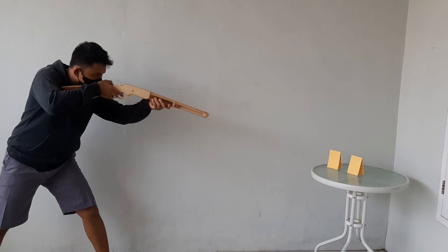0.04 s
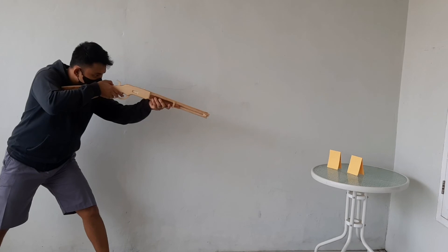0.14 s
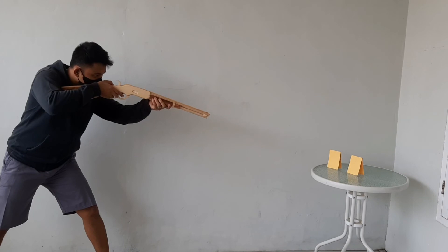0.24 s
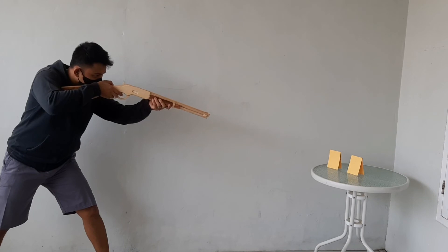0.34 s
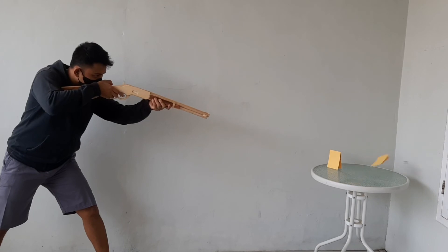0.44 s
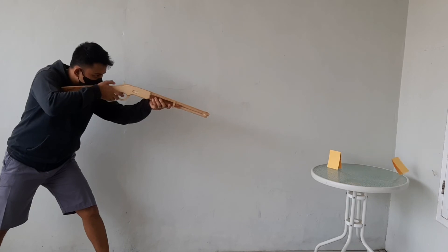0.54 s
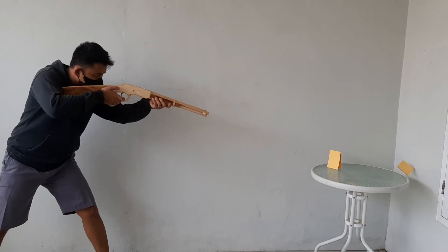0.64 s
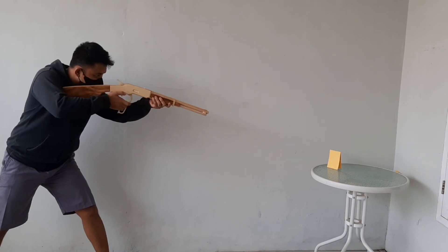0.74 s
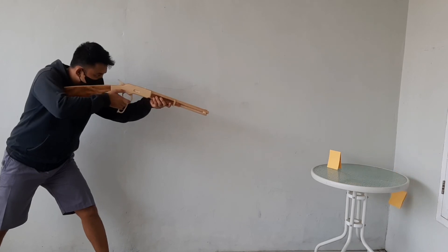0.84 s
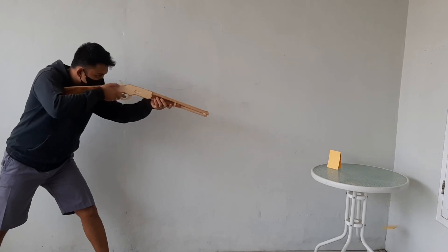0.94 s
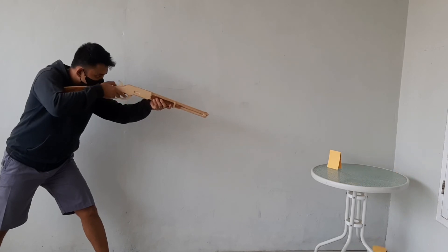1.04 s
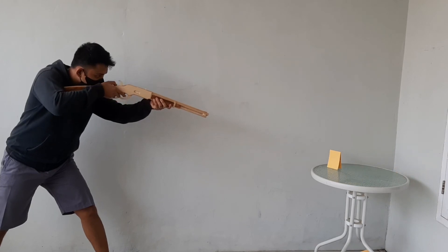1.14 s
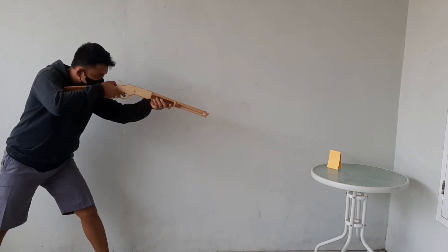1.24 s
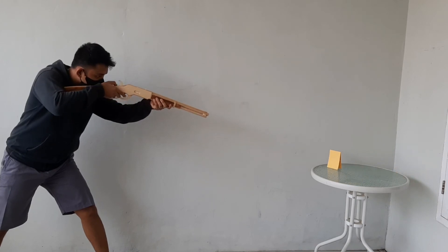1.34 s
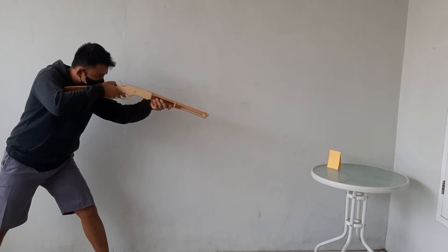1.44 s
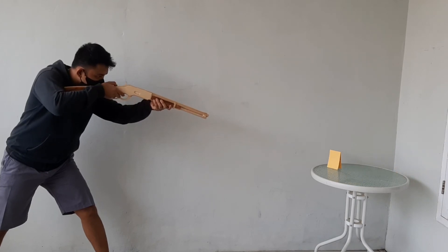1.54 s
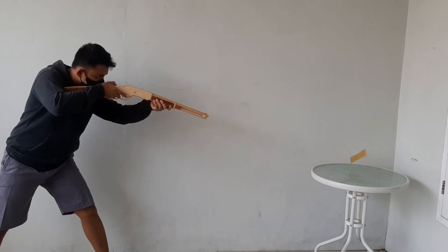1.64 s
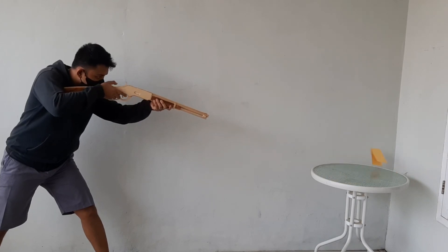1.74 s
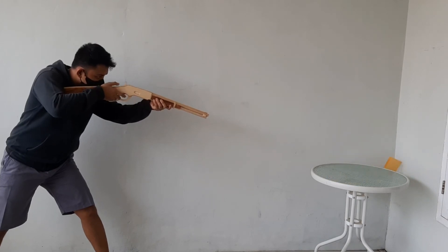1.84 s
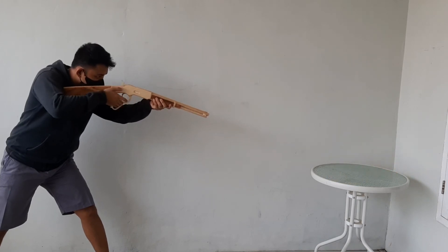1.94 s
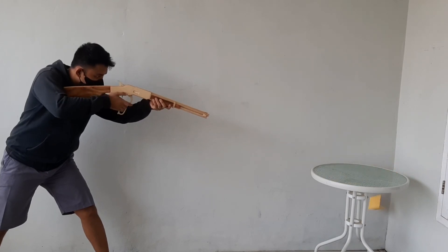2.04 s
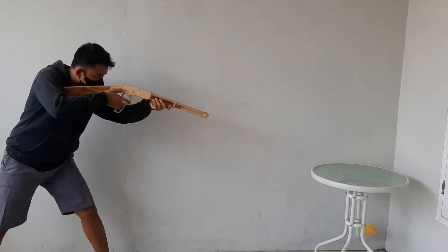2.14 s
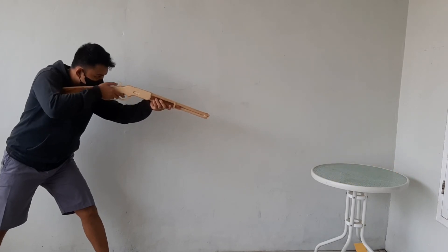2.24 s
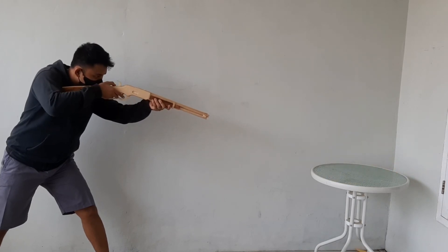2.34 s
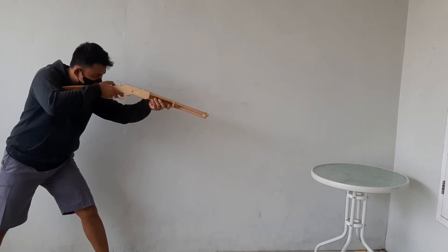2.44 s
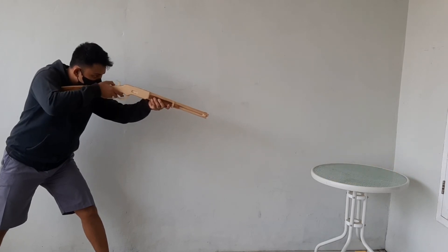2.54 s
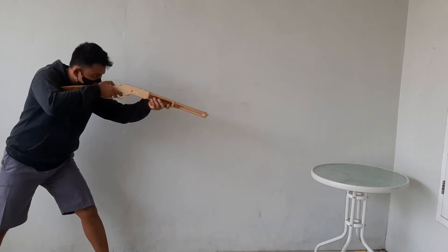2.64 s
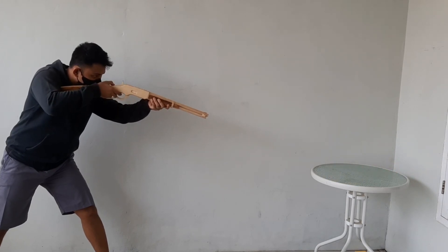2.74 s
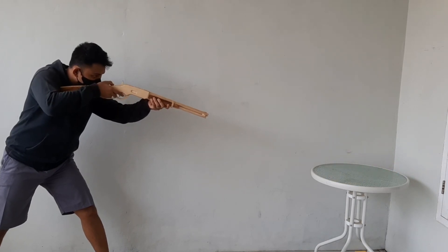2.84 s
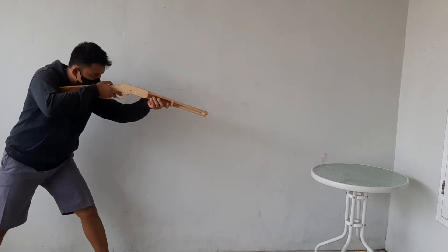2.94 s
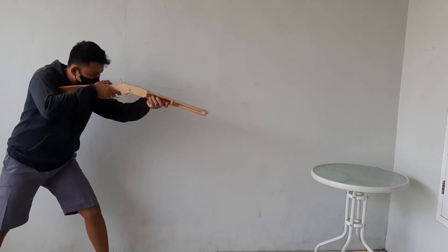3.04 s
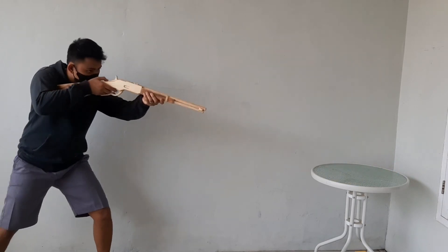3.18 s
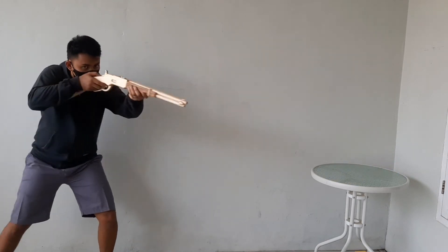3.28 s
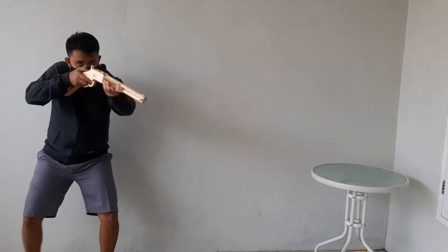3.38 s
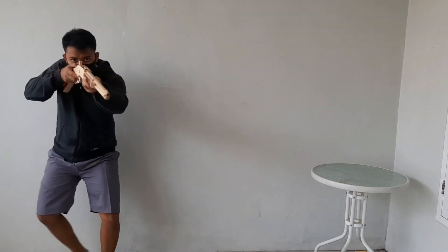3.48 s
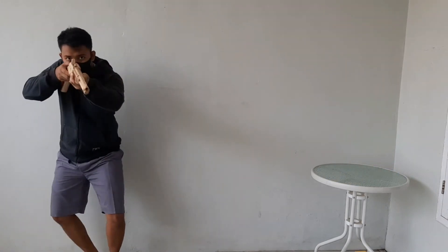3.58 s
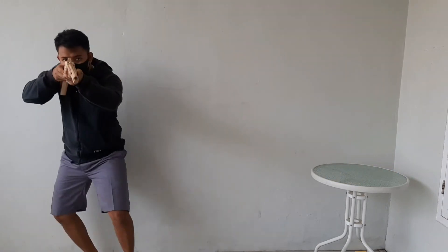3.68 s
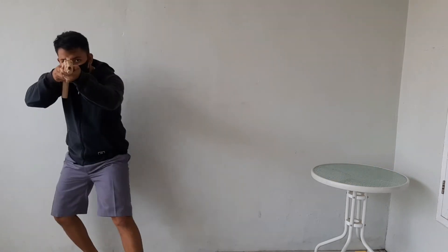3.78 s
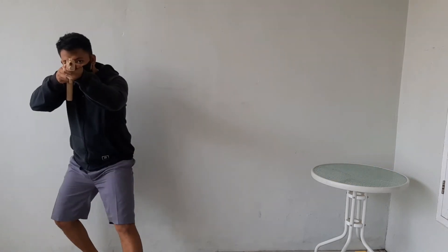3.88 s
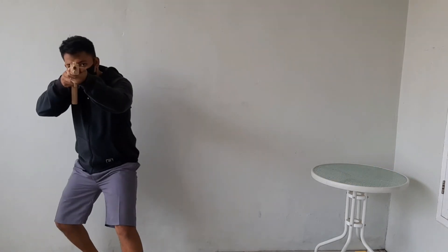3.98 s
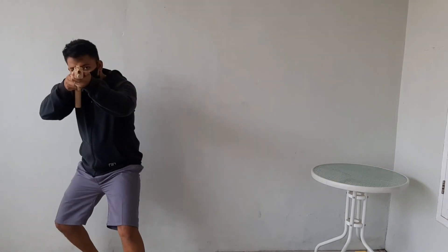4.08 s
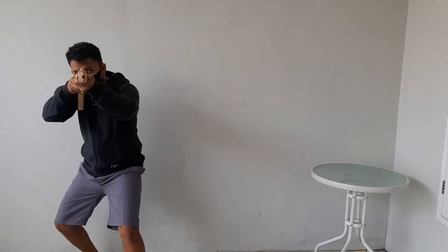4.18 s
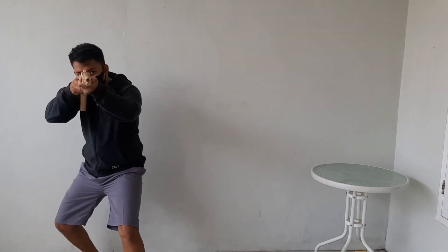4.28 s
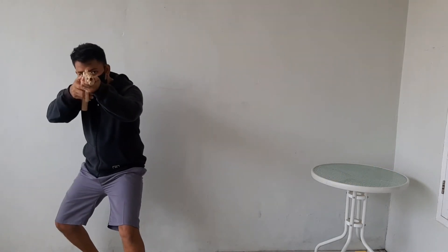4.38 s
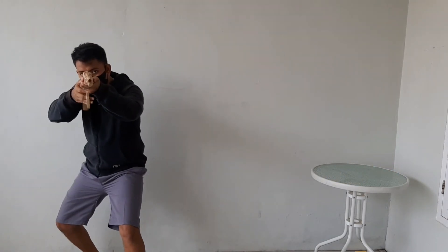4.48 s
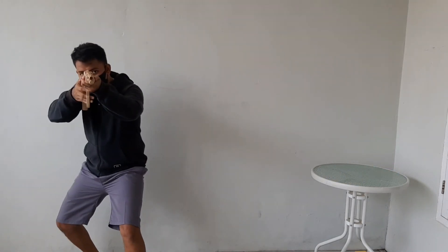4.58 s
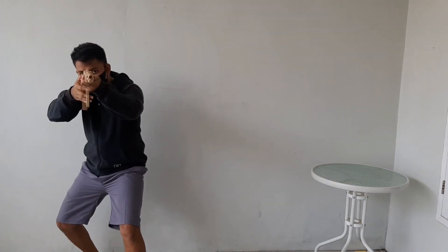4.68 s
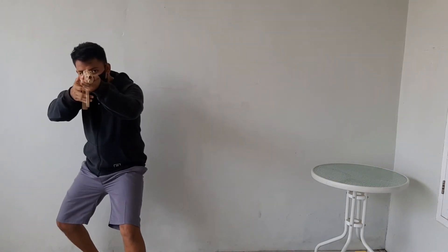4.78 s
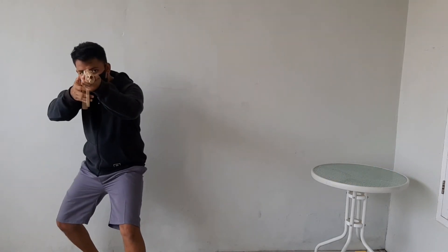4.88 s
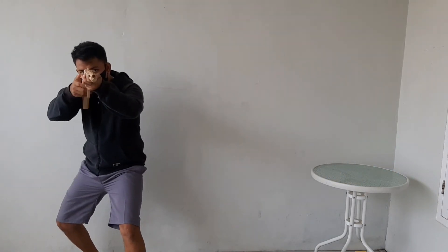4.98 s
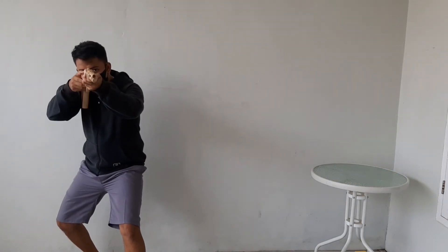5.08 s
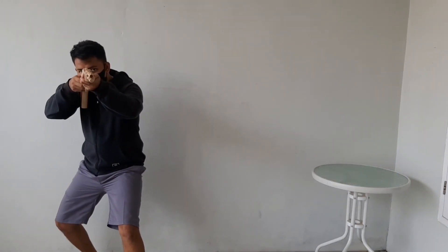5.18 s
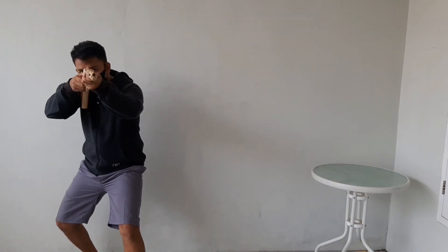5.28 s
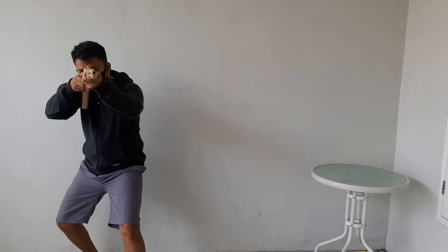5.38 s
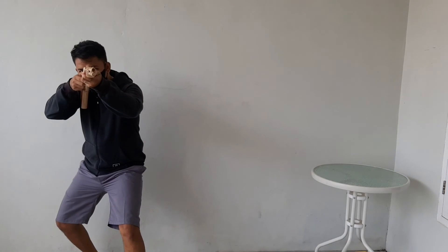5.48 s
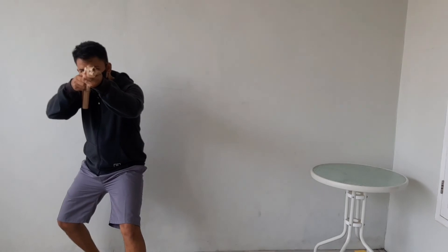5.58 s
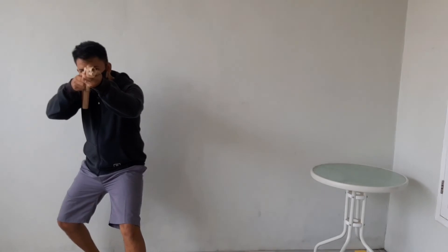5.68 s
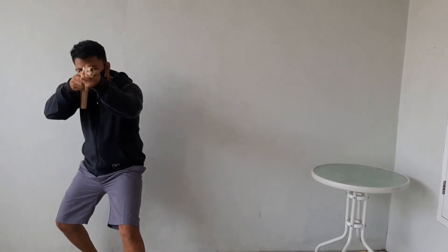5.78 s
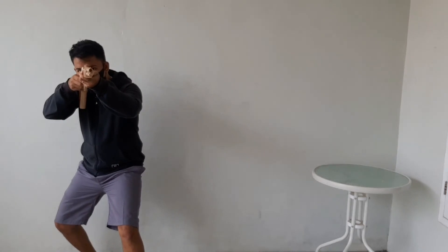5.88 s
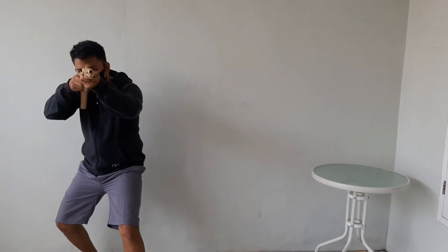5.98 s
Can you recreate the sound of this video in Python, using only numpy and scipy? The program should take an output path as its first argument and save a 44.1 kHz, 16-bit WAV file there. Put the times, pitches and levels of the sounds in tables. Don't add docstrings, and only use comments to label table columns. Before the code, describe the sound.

A bare, hard-walled room with a roughly 0.7-second tail, over faint steady hiss, distant low engine drone and a barely audible whine. At 0.4 s, after a tiny trigger creak, a wooden toy gun gives its loudest snap, ringing high and briefly, with a card slap and soft low puff right behind. The lever clacks open at 0.65 s and clicks softly shut near 1.0; the card taps the floor at 1.17 and bounces at 1.34. A second snap and slap come at 1.6, a lever clack at 1.97, a dull faint card drop at 2.1 and closing clicks at 2.3. The third snap, at 2.74, rings without a slap. Cloth rubs and a foot scuffs around 3.6. The lever clacks hard at 4.44, scuffs follow, and softer closing clicks come at 5.03 and 5.09. Quiet scuffs and sleeve rustle continue to the end at about 6 s.

```python
import sys
import numpy as np
from scipy import signal
from scipy.io import wavfile
from scipy.ndimage import uniform_filter1d

SR = 44100
rng = np.random.default_rng(int(sys.argv[2]) if len(sys.argv) > 2 else 0)


def magnitude_from_level(level_db):
    exponent = np.asarray(level_db, float) / 20
    return 10 ** exponent


def generate_wav(signal):
    frames = np.transpose(np.atleast_2d(signal))
    scaled = np.clip(frames, -1, 1) * 32767
    pcm = np.round(scaled).astype(np.int16)
    wavfile.write(sys.argv[1], SR, pcm)


N = 265482

# pitch in Hz, level in dB, time to fade by 60 dB in s.
LEVER = [(1540, -8.5, .03), (2110, 1, 0.01), (2760, -5, 0.035), (3660, -3.5, 0.039), (3770, -3.5, .03),
         (4150, -6, 0.015), (4800, -6.5, 0.023), (6010, -10, 0.016), (6600, -8.5, .025),
         (9410, -1.5, 0.026)]


def evened(x):
    return x / np.sqrt(np.mean(x ** 2) + 1e-20)


def read(points, hz):
    f, value = np.transpose(points)
    return np.interp(np.log(hz + 1), np.log(f + 1), value)


def band(x, lo_hz, hi_hz):
    return signal.sosfilt(signal.butter(2, [lo_hz, hi_hz], "band", fs=SR, output="sos"), x)


def add(mix, s, sound):
    part = mix[:, round(s * SR):][:, :sound.shape[1]]
    part += sound[:, :part.shape[1]]


def pair(left, other, same, balance_db):
    same = np.clip(same, -1, 1)[:, None]
    right = same * left + np.sqrt(1 - same ** 2) * other
    gain = magnitude_from_level(balance_db / 2)[:, None]
    return np.array([left * gain, right / gain])


def noise(spectrum, patchy_db):
    # frequency in Hz, left-right likeness from -1 to 1.
    likeness = [(60, 1), (180, 1), (550, 0.64), (1650, -0.17), (4970, 0.23), (15000, 0.23)]
    # frequency in Hz, left minus right in dB.
    balance = [(60, -11.5), (180, -2.5), (550, -7), (1650, -3.5), (4970, -2), (15000, 2.5)]
    hz = np.fft.rfftfreq(2048, 1 / SR)
    a, b, c, d, patches = rng.standard_normal((N // 512 + 5, 1025, 5)).T
    patches = uniform_filter1d(patches, size=20, axis=0)
    patches = evened(uniform_filter1d(patches, size=8, axis=1))
    drift_db = patchy_db * patches * np.clip(hz / 1500, .3, 1)[:, None]
    z = pair(a + 1j * b, c + 1j * d, read(likeness, hz), read(balance, hz))
    z *= magnitude_from_level(read(spectrum, hz)[:, None] + drift_db)
    return signal.istft(z, nperseg=2048, noverlap=1536)[1][:, :N]


def fuzzy(hz, width, apart=0.98):
    shared, *own = band(rng.standard_normal((3, N)), hz - width / 2, hz + width / 2)
    return evened(shared + apart * np.array(own))


def throb(hz, width, apart):
    x = signal.hilbert(fuzzy(hz, width, apart))
    steadier = x / np.abs(x).mean(0) ** 0.26
    return evened(steadier.real)


def swells(rows, rise=0.24, fall=0.41):
    start, length, db = np.transpose(rows)[:, :, None]
    t = np.arange(0, N + 64, 64) / SR
    u = (t - start) / length
    shape = np.clip(np.minimum(u / rise, (1 - u) / fall), 0, 1) ** 2
    gain = np.sqrt(((magnitude_from_level(db) * shape) ** 2).sum(0))
    return np.interp(np.arange(N) / SR, t, gain)


def steady_hiss():
    # frequency in Hz, level in dB.
    hiss_colour = [(18, -32), (30, -14), (60, -5.5), (125, -3), (928, -26), (1530, -20.5), (1700, -27.5),
                   (2050, -21), (3210, -29), (5030, -29.5), (7670, -30), (8530, -56), (10500, -36.5),
                   (14800, -37.5), (16500, -60.5)]
    hiss = band(noise(hiss_colour, patchy_db=3.0), 54, 18000)
    return hiss * magnitude_from_level(-63) / band(hiss.mean(0), 200, 16000).std()


def traffic():
    # start in seconds, length in seconds, level in dB.
    low_surges = [
        (.76, 0.26, -60),
        (3.05, 0.24, -63),
        (3.9, 0.23, -56.5),
        (5.0, 0.5, -54),
        (5.65, 0.43, -58),
    ]
    high_surges = [
        (.05, 0.48, -61.5),
        (1.15, .15, -58),
        (2.05, 0.2, -51.5),
        (2.73, 0.21, -50),
        (3.42, 0.59, -60),
        (4.22, 0.16, -60),
        (4.45, 0.25, -51.5),
        (4.82, 0.29, -49.5),
        (5.0, 0.3, -46.5),
        (5.65, 0.12, -59),
    ]
    low = np.hypot(magnitude_from_level(-64.5), swells(low_surges)) * throb(66, 6.5, apart=0.43) * magnitude_from_level([[4], [1.5]])
    high = np.hypot(magnitude_from_level(-62), swells(high_surges)) * throb(124, 6, apart=0.5)
    return magnitude_from_level(-2) * (low + high)


def far_whine():
    # start in seconds, length in seconds, level in dB.
    lowest = [(.1, 0.45, -73.5), (2.95, 0.57, -70), (3.29, 0.19, -74), (3.4, 0.41, -72),
              (3.82, 0.14, -71.5), (4.22, 0.26, -70.5), (5.35, 0.42, -73.5), (5.9, 0.14, -68)]
    middle = [(.2, 0.23, -77), (3.36, 0.18, -71), (4.22, 0.27, -71.5), (5.9, 0.14, -74.5)]
    highest = [(.2, 0.18, -74), (2.55, 0.17, -84), (3.25, 0.6, -77), (4.08, 0.46, -73.5), (5.25, 0.39, -72)]
    notes = [(lowest, 451.6, 18), (middle, 1335, 30), (highest, 2700, 8)]  # (swells, Hz, width Hz)
    return sum(swells(rows, rise=0.23, fall=0.17) * throb(hz, width, apart=0.32) for rows, hz, width in notes)


def feet():
    # start in seconds, length in seconds, level in dB.
    low_scuff = [
        (2.95, 0.81, -73),
        (3.32, 0.044, -79),
        (3.59, 0.066, -66),
        (4.6, 0.2, -58.5),
        (5.25, 0.22, -60),
        (5.52, 0.14, -72),
        (5.91, 0.2, -68),
    ]
    high_scuff = [
        (2.95, .35, -81),
        (4.7, 0.46, -69),
        (5.45, 0.42, -70),
        (5.74, .35, -66),
    ]
    return swells(low_scuff) * fuzzy(536, 190) + swells(high_scuff) * fuzzy(1950, 1000, apart=1.5)


def sleeve():
    # start in seconds, length in seconds, level in dB.
    rustles = [
        (3.54, 0.21, -58),
        (3.62, 0.3, -67),
        (4.7, 0.17, -75),
        (5.45, 0.69, -67.5),
        (5.9, 0.32, -69.5),
    ]
    # frequency in Hz, level in dB.
    cloth_colour = [(530, -48), (900, -13), (1270, -7), (1590, -7), (3920, 5), (8550, -8), (14600, -6),
                    (15700, -6), (16500, -56)]
    cloth = evened(noise(cloth_colour, patchy_db=-0.5))
    return magnitude_from_level(2.0) * swells(rustles, rise=0.2, fall=0.56) * cloth


def causal(db):
    log_gain = np.log(magnitude_from_level(np.r_[db, db[-2:0:-1]]))
    return np.fft.ifft(np.exp(log_gain - 1j * signal.hilbert(log_gain).imag)).real[:1024]


def room(rise_ms):
    # frequency in Hz, time to fade by 60 dB in seconds.
    fade_times = [(150, 0.84), (400, 0.79), (1000, 0.75), (2500, 0.71), (5000, 0.64), (8000, 0.59),
                  (14000, 0.44)]
    # frequency in Hz, left-right likeness from -1 to 1.
    likeness = [(100, 0.43), (300, 1), (700, 0.527), (1500, 0.062), (3000, 0.1), (7000, -0.08),
                (15000, -0.065)]
    # frequency in Hz, left minus right in dB.
    balance = [(60, 1), (180, -3), (550, -1.5), (1650, -3), (4970, -2.5), (15000, 2)]
    size = 32400
    taps = np.zeros((2, size))
    at = np.arange(0, size, 12) + rng.integers(0, 12, (2, size // 12))
    uneven_db = 2.0 * np.exp(-at / SR / 0.016) * rng.standard_normal(at.shape)
    np.put_along_axis(taps, at, rng.choice([-1., 1.], at.shape) * magnitude_from_level(uneven_db), 1)
    hz, t, z = signal.stft(taps, SR, nperseg=256)
    z = pair(*z, read(likeness, hz), read(balance, hz))
    z = z * magnitude_from_level(-60 * t / read(fade_times, hz)[:, None])
    tail = signal.istft(z, SR, nperseg=256)[1][:, :size]
    return tail * (1 - np.exp(-np.arange(size) / SR / (0.00061 * max(rise_ms, .3))))


def echoes(direct_db, rise_ms):
    # delay in ms, level in dB over the direct sound.
    first_walls = [(5.5, 3.5), (12, -5), (19, -11.5), (25, 1), (40, -4)]
    paths, t = room(rise_ms), np.arange(300) / SR
    paths /= np.sqrt(np.mean(paths[:, :3000] ** 2))
    for k, (ms, echo_db) in enumerate([(0, 0)] + first_walls):
        chatter = rng.standard_normal((3, 300)) * np.exp(-t / .002)
        burst = evened(chatter[0] + 0.6 * chatter[1:])
        source_db = min(direct_db, -3 if k else 99)
        add(paths, .001 * ms, magnitude_from_level(source_db + echo_db) * burst)
    return paths


def knock(spectrum, modes, db, direct_db, rise_ms, ring_db, tilt_db=0):
    hz, t = np.fft.rfftfreq(2048, 1 / SR), np.arange(8192) / SR
    click = causal(read(spectrum, hz) + tilt_db * np.log2(hz / 3000 + .05))
    click = np.pad(click, (0, len(t) - len(click)))
    ring = sum(magnitude_from_level(g - 60 * t / t60) * np.sin(2 * np.pi * f * t) for f, g, t60 in modes)
    lowest_hz = 0.78 * min(modes)[0]
    ring = band(band(ring, lowest_hz, 18000), lowest_hz, 18000)
    parts = click / np.linalg.norm(click), magnitude_from_level(ring_db) * ring / np.linalg.norm(ring)
    return magnitude_from_level(db) * sum(signal.fftconvolve(part[None], echoes(direct_db, rise_ms), axes=1) for part in parts)


def hard_knocks(rows, spectrum, modes):
    out = np.zeros((2, N))
    for s, *settings in rows:
        add(out, s, knock(spectrum, modes, *settings))
    return out


def soft_knocks(rows, spectrum, modes):
    settings = [(s, db, direct_db, 8, ring_db, tilt_db) for s, db, tilt_db, direct_db, ring_db in rows]
    return hard_knocks(settings, spectrum, modes)


def puff(db, hz):
    t = np.arange(4000) / SR
    turns = hz * (t + 0.015 * (1 - np.exp(-t / 0.0049)))
    return -magnitude_from_level(db) * np.sin(2 * np.pi * turns) * np.exp(-t / 0.019) * magnitude_from_level([[3], [-4]])


def cards():
    # start in seconds, echo level in dB, direct sound in dB, build-up in ms, ring in dB.
    slaps = [
        (.445, -19, -4.5, 11, -10.5),
        (1.637, -20, -7.5, 10, -6),
    ]
    # start in seconds, level in dB, pitch in Hz.
    puffs = [
        (0.45, -30, 55.3),
        (1.649, -38, 55.9),
    ]
    # start in seconds, echo level in dB, brightness in dB an octave, direct dB, ring dB.
    drops = [
        (1.1665, -43, 6, 0.5, -7),
        (1.339, -44, 3.5, 3, -15.5),
        (2.11, -51, -7.5, 2, -15),
    ]
    # frequency in Hz, level in dB.
    slap_colour = [(120, -54), (200, -18), (860, -19), (1110, -7.5), (1200, -31.5), (1500, -14), (5060, 0),
                   (8970, -14), (14500, -14.5), (15300, -20.5), (16500, -99)]
    drop_colour = [(88, -50.5), (150, -25), (236, -27.5), (265, -12), (401, -8.5), (518, -4), (934, 2.5),
                   (2810, -1), (7660, -17), (8970, -35.5), (12800, -26), (15300, -36.5), (16500, -80.5)]
    # pitch in Hz, level in dB, 60 dB fade in seconds.
    bent_ring = [(1000, -11, 0.011), (1480, -5, 0.019), (7200, 6, .012)]
    fallen_ring = [(423.7, 2, .06), (496, -3, .03), (930, -4.5, .015), (2000, -11.5, .03), (2756, -1, .03)]
    out = hard_knocks(slaps, slap_colour, bent_ring) + soft_knocks(drops, drop_colour, fallen_ring)
    for s, db, hz in puffs:
        add(out, s, puff(db, hz))
    return out


def lever():
    # start in seconds, echo level in dB, direct sound in dB over it, build-up in ms, ring in dB.
    opens = [
        (.6445, -24.5, -1.84, 3.06, -6.5),
        (1.969, -28, 0.74, 2.885, 0),
    ]
    shuts = [
        (.977, -49, -1, 4, -5),
        (1.025, -45.5, 2, 4.6, -4.5),
        (2.265, -49, -8, 10, -5.5),
        (2.319, -42.5, -5.5, 5, -6),
    ]
    front_opens = [
        (4.441, -26, -11, 13, -3.5),
    ]
    front_shuts = [
        (4.999, -59, -7, 8, -16),
        (5.033, -43, -11, 12, -19),
        (5.092, -38.5, -2.5, 4, -2.5),
    ]
    # frequency in Hz, level in dB.
    open_colour = [(120, -48), (200, -23.5), (382, -34), (728, -17), (892, -21.5), (1500, -3), (2090, -1.5),
                   (3070, -5), (4880, -2.5), (8180, -11.5), (9480, -9), (15300, -13), (16500, -55.5)]
    shut_colour = [(120, -45), (200, -14.5), (254, -29), (403, -18), (451, -15), (961, -12.5), (1500, 3),
                   (3250, -10.5), (4970, -10.5), (8650, -24.5), (14200, -29.5), (16500, -69.5)]
    front_open_colour = [(120, -42), (200, -29), (279, -25), (348, -34), (459, -22), (1070, -10.5),
                         (1500, -4), (4880, 0.5), (8030, -13), (9310, -10.5), (14200, -10.5), (15600, -15),
                         (16500, -69)]
    front_shut_colour = [(120, -33), (200, -26), (961, -13.5), (1360, -6.5), (1770, -5.5), (2090, -2.5),
                         (3130, -9.5), (5250, -14), (8650, -25.5), (11200, -25.5), (14500, -28),
                         (16500, -73)]
    # pitch in Hz, level in dB, 60 dB fade in seconds.
    stock_ring = [(1450, -2, 0.019), (2100, 2, 0.026), (2610, -10, 0.023), (5000, -14, 0.015)]
    muzzle_ring = [(2166, -7.5, 0.046), (2370, -7, 0.057), (4120, -2, .04), (4880, -1, 0.0393),
                   (6630, 1, 0.01), (9630, -6.5, 0.038)]
    side = hard_knocks(opens, open_colour, LEVER) + hard_knocks(shuts, shut_colour, stock_ring)
    front = hard_knocks(front_opens, front_open_colour, muzzle_ring)
    return side + front + hard_knocks(front_shuts, front_shut_colour, stock_ring)


def trigger():
    # start in seconds, echo level in dB, brightness in dB an octave, direct dB, ring dB.
    creaks = [
        (.37, -59.5, 5, -6.5, -37),
        (.385, -51, -6, -14, -24),
        (1.598, -52.5, -0.5, -2, -34),
        (2.705, -55.5, -0.5, -8, -27.5),
        (2.729, -61, -6.5, -11, -27.5),
    ]
    # frequency in Hz, level in dB.
    creak_colour = [(500, -35), (1200, -1), (2000, 3.5), (3500, -10), (6000, -31), (15000, -36)]
    return soft_knocks(creaks, creak_colour, LEVER)


def hammer():
    # start in seconds, echo level in dB, direct sound in dB over it, build-up in ms, ring in dB.
    shots = [
        (.4105, -16.5, -11, 2.6, -3.5),
        (1.608, -17.5, -13, 9.4, 0),
        (2.7365, -20, -13, 10.2, 5.5),
    ]
    latches = [
        (1.030, -50, 3, 4, -0.5),
        (4.432, -57, -4, 5, -1),
        (5.085, -52.5, 1, 4, 4),
    ]
    # frequency in Hz, level in dB.
    snap_colour = [(100, -69.5), (200, -42), (420, -39), (520, -34), (1200, -27), (1450, -14.5),
                   (2500, -13.5), (4210, -17), (5060, -6.5), (5980, -22.5), (8800, -29), (9700, -23.5),
                   (14700, -27.5), (16500, -84)]
    # pitch in Hz, level in dB, 60 dB fade in seconds.
    hammer_ring = [(4680, -13.5, .04), (5030, -3.5, .06), (5040, -2, 0.042), (5030, 5, 0.037),
                   (5040, -4.5, 0.067), (5454, -13.5, .035), (5714, -16, .03), (5150, 4, .01),
                   (7230, -14.5, 0.031)]
    notch_ring = [(2700, -3, .012), (4900, 0, .007), (5235, -8, .01)]
    return hard_knocks(shots, snap_colour, hammer_ring) + hard_knocks(latches, snap_colour, notch_ring)


def scene():
    background = steady_hiss() + traffic() + far_whine()
    shooter = feet() + sleeve()
    gun = cards() + lever() + trigger() + hammer()
    return background + shooter + gun


def top_cut(x):
    return signal.sosfilt(signal.butter(12, 16690, fs=SR, output="sos"), x)


def record(dry):
    heard = signal.sosfilt(signal.butter(2, 30, "high", fs=SR, output="sos"), dry)
    heard = signal.oaconvolve(heard, signal.firwin(255, 16300, fs=SR)[None], "same")
    return top_cut(heard)


dry = scene()
out = record(dry)
generate_wav(out)
```